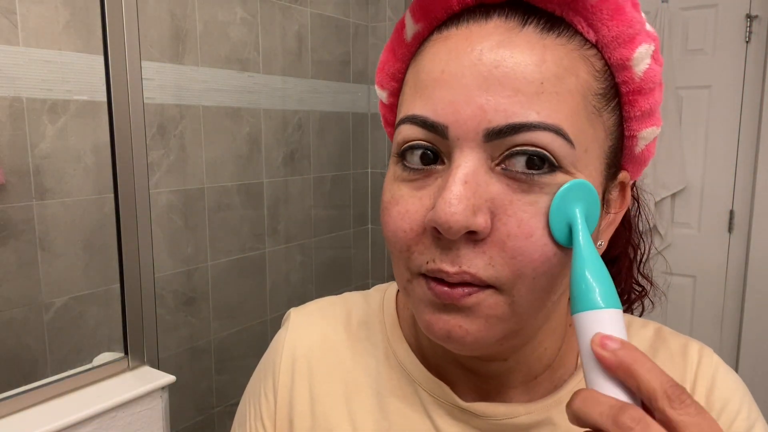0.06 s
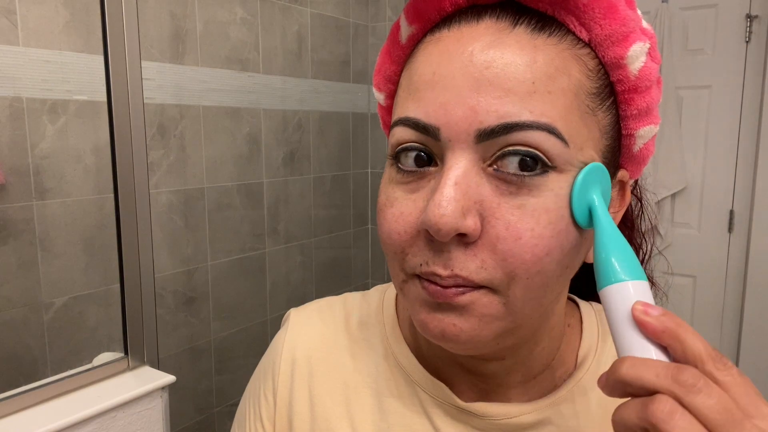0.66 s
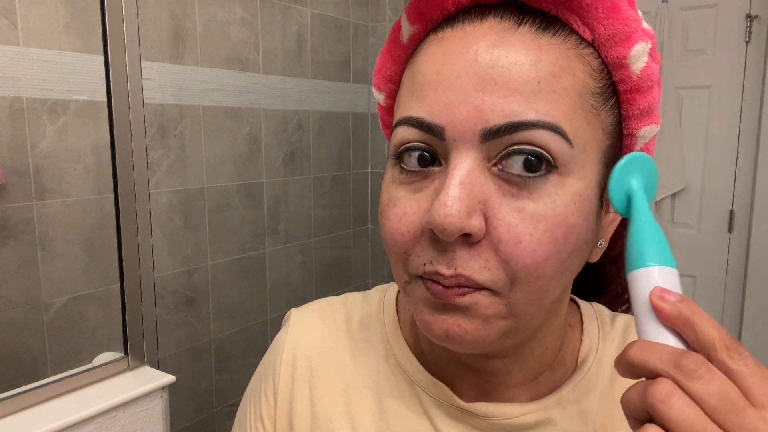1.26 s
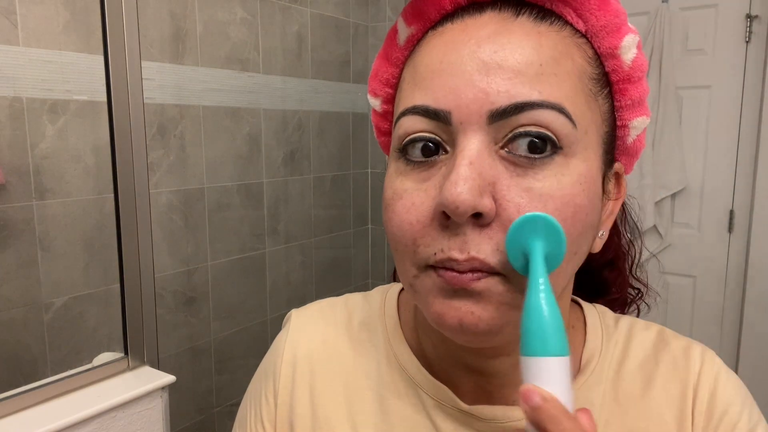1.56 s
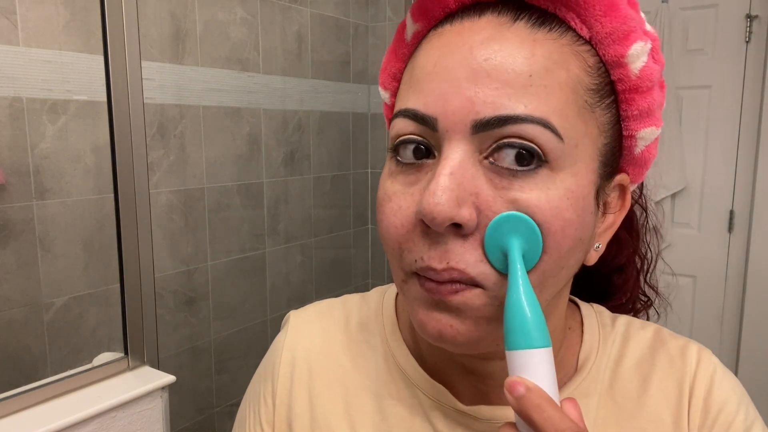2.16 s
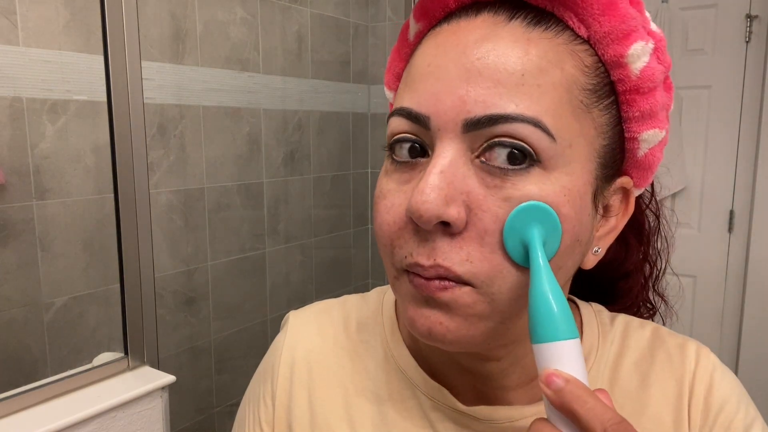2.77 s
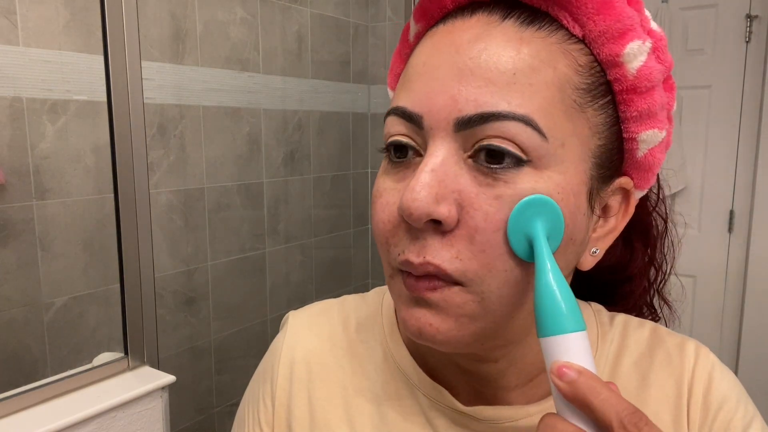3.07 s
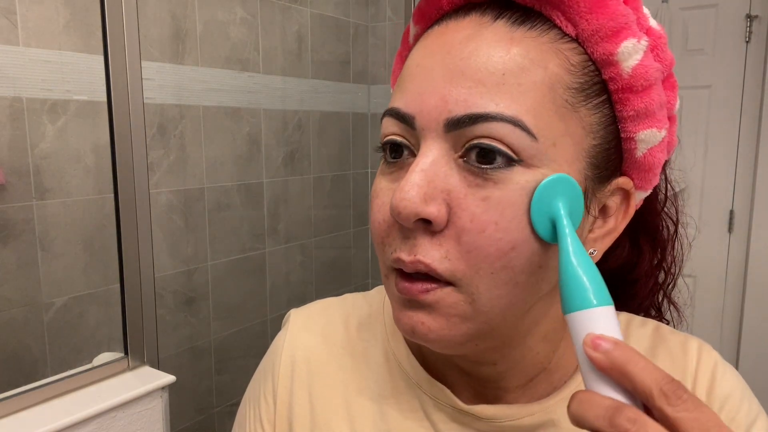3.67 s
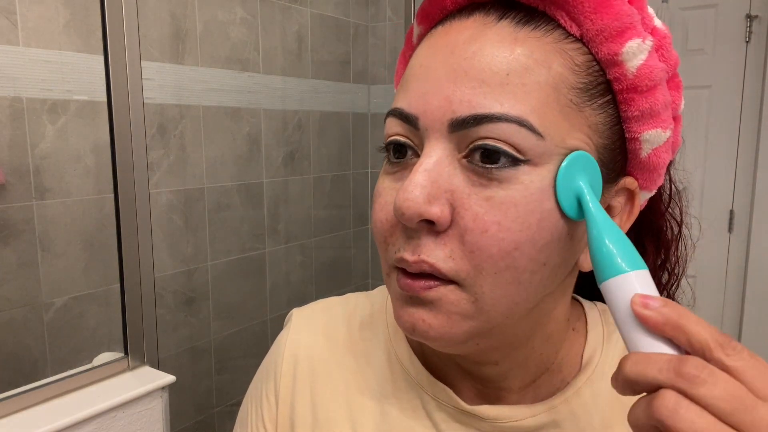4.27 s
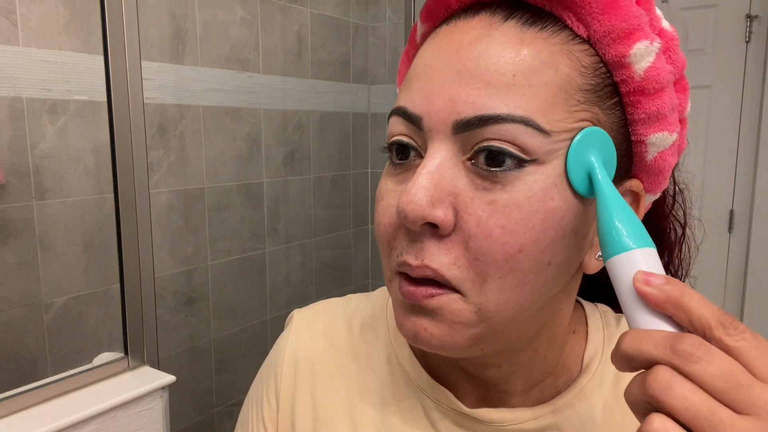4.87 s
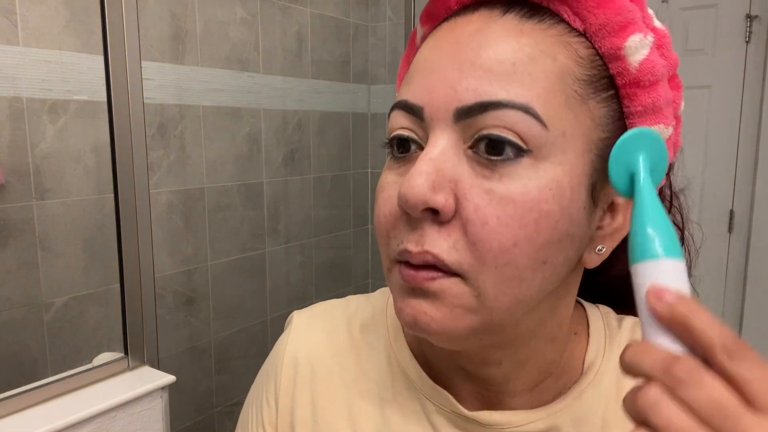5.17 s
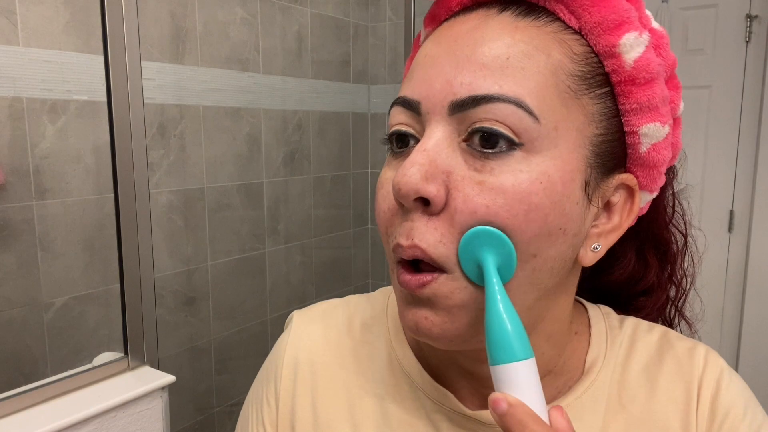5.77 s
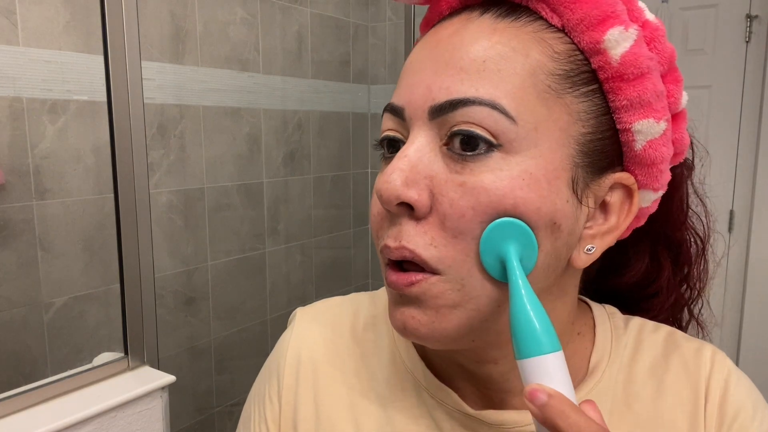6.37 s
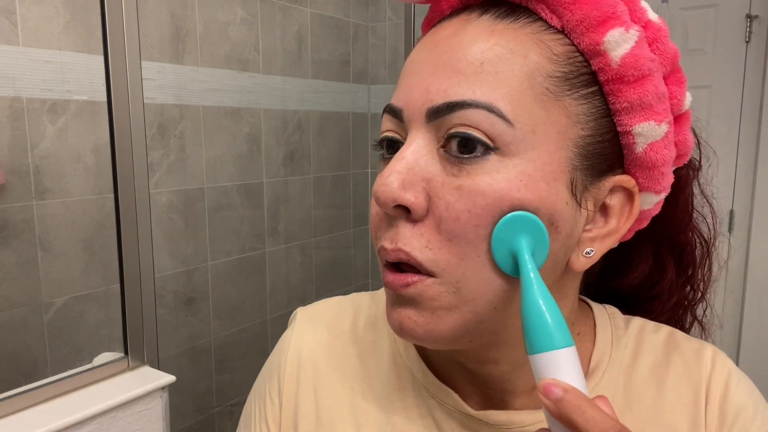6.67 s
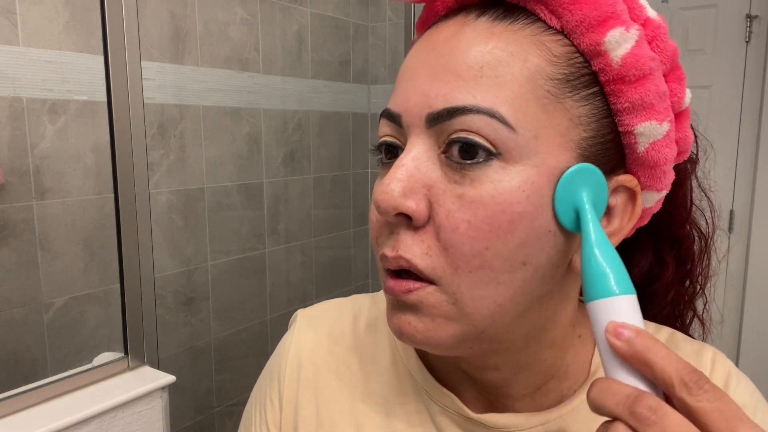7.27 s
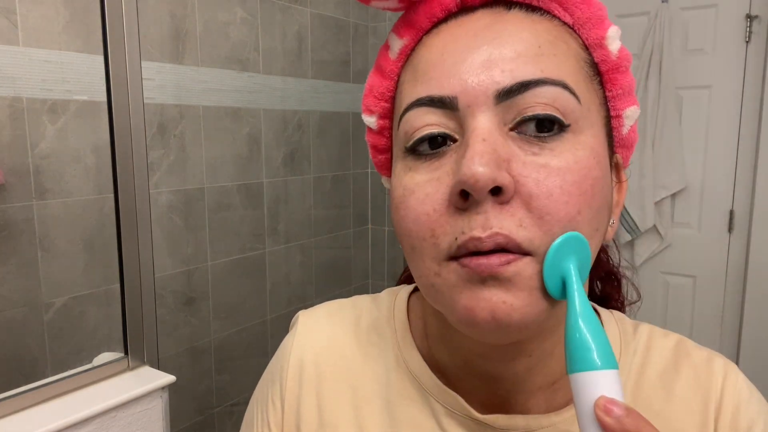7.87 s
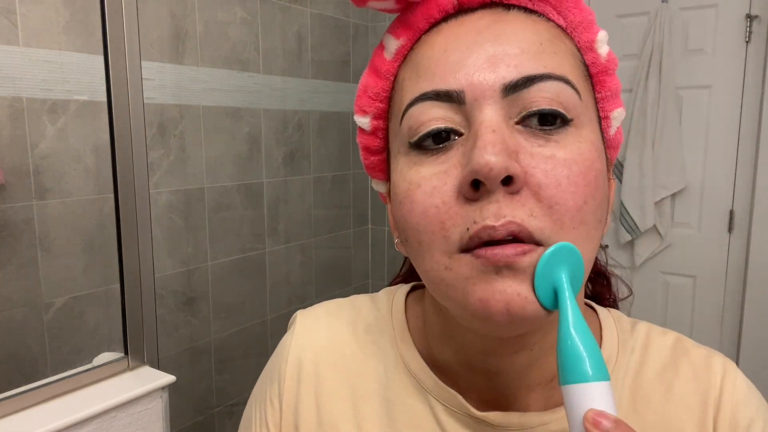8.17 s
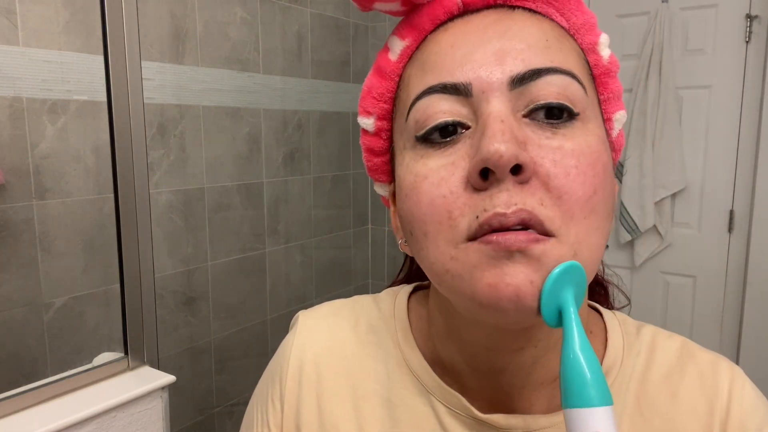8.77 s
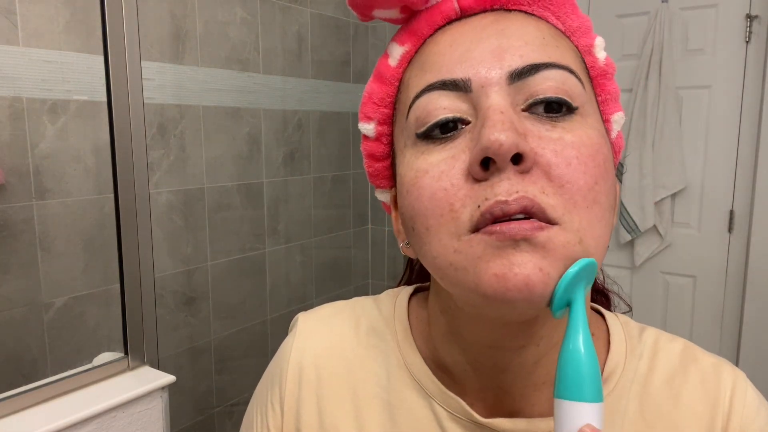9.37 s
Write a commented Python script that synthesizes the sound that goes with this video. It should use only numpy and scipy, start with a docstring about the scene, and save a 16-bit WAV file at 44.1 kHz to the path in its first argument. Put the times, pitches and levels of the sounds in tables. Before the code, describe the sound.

The thin, rattly plastic buzz of a handheld facial massager, dipping slightly in pitch when pressed on skin and rising between strokes.

```python
"""A battery face massager buzzes in a small tiled bathroom. Its off-centre weight hums and knocks twice
a turn, ringing the plastic parts; the motor brushes chatter. Pressed on skin, the motor slows; lifted
for a new stroke, it speeds up, rattles more loosely and the head rings. The pad rubs and chafes on the
skin. Soft bumps, a low room rumble and mains hum lie below."""
import sys
import numpy as np
from scipy import signal
from scipy.fft import rfft, irfft
from scipy.io import wavfile
from scipy.ndimage import uniform_filter1d

SR = 44100
rng = np.random.default_rng(int(sys.argv[2]) if len(sys.argv) > 2 else 0)


def output_pcm(signal):
    """Save a mono or channel-first signal as 16-bit PCM at the path in sys.argv[1].

    Samples are clipped to [-1, 1] before scaling.
    """
    pcm = np.clip(np.atleast_2d(signal).T, -1, 1) * 32767
    wavfile.write(sys.argv[1], SR, np.round(pcm).astype(np.int16))


N = 424683
TIME_S, FREQ_HZ = np.arange(N) / SR, np.maximum(np.arange(N // 2 + 1) * SR / N, 1)
TOP_HZ, ROOM_WET_DB = 14000, -7
GRIP_DB, GRIP_RATE_HZ = 1.53, 8  # shifting grip: each part wavers on its own

# Noise spectra, room and skin: f/Hz, relative level/dB
RUMBLE_SPECTRUM = [(15, -44), (28, -19), (40, 1), (60, -6), (80, 3), (120, 1.5), (160, -12), (240, -29),
                   (4000, -17), (14000, -30)]
RUB_SPECTRUM = [(80, -18), (170, 2), (700, 4), (1100, -6), (3000, -5), (14000, -24)]
# Stick-slip patches: t/s, length/s, level/dB, f/Hz
CHAFE_EVENTS = [(3.303, 0.37, -60.5, 610), (5.691, .52, -61, 616), (6.833, 0.31, -59.5, 610),
                (7.978, 0.328, -59, 560.5)]
# Bumps of hand and head: t/s, level/dB, f/Hz, T60/s
BUMP_EVENTS = [(0.33, -53.5, 230, 0.36), (1.285, -45.5, 620, 0.085), (2.619, -46, 482.6, 0.14),
               (3.327, -34.5, 1557, 0.055), (3.328, -52, 400.8, 0.16), (5.304, -48, 338.6, 0.12),
               (7.473, -50, 369.9, .22), (7.569, -45.5, 382, 0.22)]
# Shaft rate under changing load: t/s, f/Hz
SHAFT_HZ = [(0.0, 102.2), (0.21, 104.8), (0.59, 105.5), (1.07, 103.8), (1.18, 105), (1.31, 110.1),
            (1.39, 111.1), (1.55, 109.2), (1.82, 110.3), (1.98, 108.2), (2.79, 104.4), (3.0, 105.6),
            (3.99, 106.1), (4.4, 107.7), (4.91, 106.1), (5.02, 106.6), (5.18, 112.5), (5.25, 113.3),
            (5.34, 112), (5.52, 112.5), (5.66, 110.9), (6.49, 107.4), (6.68, 108.1), (6.97, 107.5),
            (7.3, 108.4), (7.45, 112.9), (7.51, 114), (7.64, 112.3), (7.89, 111.2), (8.1, 112.1),
            (8.39, 108.4), (8.72, 108.1), (8.96, 107), (9.63, 108.9)]
# Pad lift-offs: t/s
LIFTS_S = [1.16, 5.02, 6.8]
# Contacts in one turn: phase/turns, then relative level/dB into handle, head, neck, tick
CONTACTS = [(.29, 16.5, 14.5, 0.5, 0), (.575, 10, 25, 6.5, 2.5)]
# Resonances of the parts: f/Hz, width/Hz, relative level/dB
BARREL_MODES = [(635, 36, 7.5), (754, 41, 5.5), (875, 39, 9), (973, 11.6, 15.5), (1024, 110, 4)]
CAP_MODES = [(1176, 200, -12), (1300, 24, 8.5)]
HANDLE_MODES = [(1462, 82, 0.09), (1749, 166, -1.1)]
SOCKET_MODES = [(2387, 72, -1.2), (2564, 94, -0.79)]
COLLAR_MODES = [(2870, 290, 0)]
NECK_MODES = [(3177, 80, -0.97), (3504, 120, -0.5)]
STEM_MODES = [(3740, 220, -1.5), (4050, 240, -1.5), (4380, 260, -1)]
RIM_MODES = [(4726, 100, -0.56), (4814, 190, -1), (5040, 86, -2)]
CASING_MODES = [(5320, 260, -1.5), (5943, 100, 0.53)]
TICK_MODES = [(6646, 96, 3), (7190, 690, -2), (7604, 580, -4.5)]
BRUSH_MODES = [(8240, 860, 1.5), (9620, 880, 2), (10900, 520, 2), (12500, 680, -14)]
# Moving resonances: t/s, f/Hz
HEAD_HZ = [(0, 2060), (.6, 2050), (1.2, 2060), (1.7, 2140), (2.2, 2047), (5.0, 2020), (5.25, 2150),
           (6.2, 2015), (6.8, 2160), (7.2, 2080), (7.5, 2147), (8.2, 2108), (8.5, 2138), (9.63, 2138)]  # sinks under skin load
WHISTLE_HZ = [(3.0, 4800), (4.5, 4955), (4.9, 4780), (9.63, 4900)]  # rim, with the pad on bone
WHINE_HZ = [(0, 6000), (1.1, 6130), (1.45, 6200), (1.9, 6140), (2.25, 6200), (3.3, 6360), (4.1, 6000),
            (5.0, 5997), (5.3, 6265), (6.5, 6160), (7.6, 6208), (9.63, 6180)]
# Envelopes of hum and parts, before grip waver: t/s, level/dB
HUM_DB = [(0, -57), (.35, -47.5), (1.4, -51), (2.2, -43), (2.8, -52), (4.0, -51), (4.55, -46), (5.6, -49.5),
          (6.35, -44), (7.4, -48.5), (8.15, -55.5), (8.45, -43), (9.63, -44)]
BARREL_DB = [(0.0, -60.5), (0.4, -53.5), (0.88, -54.5), (1.04, -64), (1.42, -55), (1.63, -58.5), (2.5, -57),
             (3.15, -55.5), (4.85, -57), (5.5, -56.5), (6.45, -60), (6.81, -56), (8.26, -56.5),
             (8.53, -63.5), (8.9, -51.5), (9.63, -56.5)]
CAP_DB = [(0.0, -56), (0.94, -54.5), (2.3, -50), (2.38, -54.5), (3.2, -57.5), (5.12, -55), (5.35, -62),
          (5.44, -56.5), (7.13, -50.5), (7.67, -59), (7.86, -48.5), (8.45, -53), (9.63, -45.5)]
HANDLE_DB = [(0, -48.5), (1.1, -49.5), (1.5, -49), (2.3, -46), (2.65, -51), (2.85, -48.5), (3.1, -51.5),
             (3.35, -48.5), (4.9, -46.5), (5.3, -47.5), (5.65, -44), (6.4, -46), (8.0, -45.5),
             (9.63, -43.5)]
HEAD_DB = [(0, -46.5), (.6, -45), (1.08, -52), (1.42, -34), (1.62, -35.5), (2.0, -47), (2.41, -42.5),
           (3.97, -40.5), (4.43, -45.5), (4.99, -42.5), (5.28, -34.5), (5.6, -45), (5.92, -51),
           (6.14, -44.5), (6.5, -44), (6.88, -38.5), (7.2, -43), (7.53, -36), (7.8, -42.5), (8.3, -41),
           (8.7, -38.5), (9.18, -38.5), (9.28, -41), (9.63, -41.5)]
SOCKET_DB = [(0.0, -49.5), (1.15, -53), (1.34, -44), (1.9, -51), (2.01, -42), (2.06, -51), (2.36, -46),
             (2.41, -53.5), (4.13, -49.5), (4.5, -54), (5.34, -47), (5.98, -48.5), (6.33, -42), (6.54, -48),
             (6.68, -43.5), (6.81, -46.5), (9.63, -49.5)]
COLLAR_DB = [(0.0, -50.5), (1.29, -52), (1.34, -46), (2.79, -47), (3.32, -47), (3.86, -49.5), (4.8, -42),
             (5.42, -54), (5.85, -42.5), (7.32, -52.5), (8.13, -48), (8.23, -40.5), (8.6, -56),
             (9.63, -53.5)]
NECK_DB = [(0.0, -39.5), (0.45, -40.5), (0.67, -45), (0.72, -40), (1.37, -42), (1.71, -48.5), (1.9, -41.5),
           (2.25, -41.5), (2.57, -38.5), (2.63, -44), (2.76, -39.5), (3.3, -38), (5.3, -43.5), (5.39, -45),
           (5.85, -40.5), (6.25, -44), (8.5, -44.5), (9.63, -44)]
STEM_DB = [(0.0, -44), (0.24, -43.5), (1.2, -44.5), (1.66, -39), (2.33, -43.5), (4.93, -45), (5.15, -41),
           (5.85, -46), (6.84, -40.5), (7.03, -43), (7.9, -39.5), (9.63, -45.5)]
WHISTLE_DB = [(0, -49), (.4, -54), (2.7, -44), (3.2, -40), (3.4, -50), (4.1, -50), (4.42, -39), (4.95, -39),
              (5.2, -54), (5.39, -39), (5.55, -58), (8.6, -50), (9.0, -42), (9.3, -42), (9.55, -40)]
CASING_DB = [(0.0, -44), (0.13, -42), (0.72, -47.5), (1.53, -45), (2.22, -48), (4.24, -43), (6.81, -49),
             (7.03, -40.5), (7.53, -46.5), (7.67, -39), (8.56, -45), (9.63, -45)]
WHINE_DB = [(0.0, -43), (1.39, -50), (1.5, -37.5), (1.61, -44), (2.06, -39), (2.71, -52.5), (3.86, -43.5),
            (5.1, -44.5), (6.54, -42), (6.92, -51), (7.0, -45), (7.43, -45), (7.72, -45), (9.63, -42)]
TICK_DB = [(0.0, -47.5), (1.15, -52.5), (1.48, -46.5), (2.82, -50), (3.81, -44), (4.35, -50), (6.46, -48.5),
           (8.1, -43.5), (8.29, -47.5), (9.63, -51)]


def undb(db):
    """dB to gain."""
    return 10 ** (np.asarray(db) / 20)


def unit(x):
    """Scale the channel mean to rms 1."""
    return x / np.std(np.atleast_2d(x).mean(0))


def hold_rms(x, window_samples=6000):
    """Hold the channel mean at running rms 1."""
    return x / np.sqrt(uniform_filter1d(x.mean(0) ** 2, window_samples) + 1e-18)


def curve(table):
    """Timed table, interpolated per sample."""
    return np.interp(TIME_S, *np.transpose(table))


def ramp(start_s, rise_s):
    """Linear rise, 0 to 1."""
    return np.clip((TIME_S - start_s) / rise_s, 0, 1)


def wander(rate_hz):
    """Smooth random signal, spread 1."""
    size = int(SR / rate_hz)
    held = np.repeat(rng.standard_normal(N // size + 1), size)[:N]
    return unit(uniform_filter1d(uniform_filter1d(held, size), size))


def clicks(times_s, sizes, half_taps=8):
    """Band-limited clicks placed between samples."""
    at = times_s[:, None] * SR
    index = np.floor(at).astype(int) + np.arange(1 - half_taps, half_taps + 1)
    shape = np.sinc(index - at) * np.sinc((index - at) / half_taps)
    return np.bincount(np.clip(index, 0, N).ravel(), (sizes[:, None] * shape).ravel(), N + 1)[:N]


def colour(x, spectrum):
    """Filter by a spectrum table."""
    hz, db = np.transpose(spectrum)
    return irfft(rfft(x) * undb(np.interp(np.log(FREQ_HZ), np.log(hz), db)), N)


def band_sos(low_hz, high_hz):
    """Butterworth band-pass sections."""
    return signal.butter(2, [low_hz, high_hz], "band", fs=SR, output="sos")


def resonate(x, modes):
    """Ring static modes, signs alternating."""
    return sum((-1) ** k * undb(db) * signal.lfilter(*signal.iirpeak(hz, hz / width_hz, fs=SR), x)
               for k, (hz, width_hz, db) in enumerate(modes))


def glide(x, hz, width_hz):
    """Ring one mode, centre given per sample."""
    spin = np.exp(2j * np.pi * np.cumsum(hz) / SR)
    pole = np.exp(-np.pi * width_hz / SR)
    return (spin * signal.lfilter([1 - pole], [1, -pole], x / spin)).real


def pan(left_db):
    """Stereo gains, left relative to right."""
    return undb(np.array([[left_db], [0]]))


def bathroom(x, left_db, wet_db, t60_s=0.42, gap_s=0.003, sway_rad_per_s=0.74):
    """Panned direct sound plus tile reflections that shift as the hand moves."""
    t = TIME_S[:SR // 2]
    tails = rng.standard_normal((2, 2, len(t))) * np.exp(-np.log(1000) * t / t60_s) * (t > gap_s)
    tails /= np.sqrt(np.sum(tails ** 2, axis=2, keepdims=True))
    here, there = signal.fftconvolve(x[None, None], tails, axes=2)[:, :, :N]
    angle = sway_rad_per_s * (TIME_S + wander(1.478))
    return pan(left_db) * x + undb(wet_db) * (np.cos(angle) * here + np.sin(angle) * there)


def room_tone(rumble_db=-50, swell_db=1, mains_hz=60.7, mains_db=-56.5):
    """Swelling low rumble, faint hiss and wavering mains hum."""
    noise = rng.standard_normal(N) + 4.4 * rng.standard_normal((2, N))
    rumble = undb(rumble_db) * unit(pan(left_db=1.5) * colour(noise, RUMBLE_SPECTRUM))
    mains = unit(pan(left_db=-2) * np.sin(2 * np.pi * mains_hz * TIME_S + np.array([[0], [0.9]])))
    swell = undb(swell_db * wander(6))
    return swell * (rumble + undb(mains_db + 4.2 * wander(8.7)) * mains)


def bumps(rise_s=0.00078, thud_hz=130, thud_db=2):
    """Hand and head bump: a short scuff over a low thud; brighter ones thud less."""
    out = np.zeros((2, N))
    t = TIME_S[:SR // 2]
    for start_s, db, scuff_hz, t60_s in BUMP_EVENTS:
        noise = rng.standard_normal((2, len(t)))
        scuff, thud = (unit(signal.sosfilt(band_sos(0.71 * hz, 1.5 * hz), noise))
                       for hz in (scuff_hz, thud_hz))
        thud_gain = undb(thud_db) * min(1, 400 / scuff_hz)
        envelope = (1 - np.exp(-t / rise_s)) * np.exp(-np.log(1000) * t / t60_s)
        start = int(start_s * SR)
        out[:, start:start + len(t)] += undb(db) * (scuff + thud_gain * thud) * envelope
    return out


def rubbing(drag_db=-65.5, catch_db=2.2, press_db=9, press_s=2.967, rise_s=0.38, fall_s=0.61):
    """The pad drags on skin, catching and slipping; harder once, across the cheek."""
    press = ramp(press_s, rise_s) - ramp(press_s + rise_s, fall_s)
    level_db = drag_db + press_db * press + catch_db * wander(25)
    return undb(level_db) * unit(colour(rng.standard_normal((2, N)), RUB_SPECTRUM))


def chafes(slips_per_s=300, width_hz=110, edge_s=0.05):
    """Uneven slips ring the soft pad in short patches."""
    out = 0
    for start_s, length_s, db, hz in CHAFE_EVENTS:
        times_s = np.cumsum(rng.exponential(1 / slips_per_s, N // 100))
        times_s = times_s[times_s < TIME_S[-1]]
        slips = clicks(times_s, rng.standard_normal(len(times_s)))
        centre_hz = np.full(N, hz)
        ring = glide(glide(slips, centre_hz, width_hz), centre_hz, 2 * width_hz)
        gate = ramp(start_s, edge_s) - ramp(start_s + length_s - edge_s, 2 * edge_s)
        out = out + undb(db) * unit(ring) * gate
    return bathroom(out, left_db=-4, wet_db=ROOM_WET_DB)


def brush_chatter(turns, gaps=6, creep_s=1.6e-5, jitter_s=4e-6):
    """Brushes tick over the commutator gaps; timing creeps, so high overtones shimmer."""
    train = 0
    for phase in np.arange(gaps) / gaps:
        times_s = np.interp(np.arange(int(turns[-1])) + phase, turns, TIME_S)
        error_s = creep_s * wander(1.51) + jitter_s * rng.standard_normal(N)
        train = train + clicks(times_s + np.interp(times_s, TIME_S, error_s), np.ones(len(times_s)))
    return train


def head_slack(shaft_hz, free_hz=116, free_slack=0.2, lift_slack=1.8,
               rise_s=0.063, hold_s=0.28, fall_s=0.12):
    """Head play in its socket, 1 = tight: more at high speed (light load), most at lift-off."""
    unloaded = (1 + np.tanh((shaft_hz - free_hz) / 2)) / 2
    lifting = sum(ramp(s - rise_s / 2, rise_s) - ramp(s + hold_s, fall_s) for s in LIFTS_S)
    return 1 + free_slack * unloaded + lift_slack * lifting


def knocks(turns, slack, jitter_s=3e-6, creep_s=2e-5, scatter_db=0.73):
    """One click train per contact; a loose head strikes less evenly and the contact point creeps."""
    trains = []
    for phase, *_ in CONTACTS:
        times_s = np.interp(np.arange(int(turns[-1])) + phase, turns, TIME_S)
        play, creep = (np.interp(times_s, TIME_S, x) for x in (slack, wander(7)))
        late, size = rng.standard_normal((N // 100, 2))[:len(times_s)].T
        strikes_s = times_s + jitter_s * play * late + creep_s * creep
        trains.append(clicks(strikes_s, undb(scatter_db * size)))
    return np.array(trains)


def flex(x, modes, depth=0.022, rate_hz=2.2):
    """Modes drift together as the neck bends against the skin."""
    stretch = 1 + depth * wander(rate_hz)
    return sum((-1) ** k * undb(db) * glide(x, hz * stretch, width_hz)
               for k, (hz, width_hz, db) in enumerate(modes))


def radiate(ring, level_db, band_hz, left_db, wet_db=ROOM_WET_DB):
    """One part radiates its band into the room; its level wavers with the grip."""
    gain = undb(level_db + GRIP_DB * wander(GRIP_RATE_HZ))
    band = signal.sosfiltfilt(band_sos(*band_hz), ring)
    return gain * hold_rms(bathroom(band, left_db, wet_db))


def massager(wobble_hz=0.0721, rim_db=-46, clack_db=-8, chatter_db=-48, chin_db=-2.5):
    """The weight hums at shaft rate; knocks, scraping and brush chatter ring the plastic parts."""
    shaft_hz = curve(SHAFT_HZ) + wobble_hz * wander(14)
    hum_db = curve(HUM_DB) + GRIP_DB * wander(GRIP_RATE_HZ)
    turns = np.cumsum(shaft_hz) / SR
    slack = head_slack(shaft_hz)
    contact_gains = undb(np.array(CONTACTS)[:, 1:]).T
    handle, head, neck, tick = (unit(x) for x in contact_gains @ knocks(turns, slack))
    brushes = unit(brush_chatter(turns))
    scrape = unit(1 + np.cos(2 * np.pi * (turns - CONTACTS[1][0]))) / 2

    def scraped(drive, hiss_db, play=slack):
        """Clicks plus scraping hiss that swells around the main knock."""
        return unit(drive) + undb(hiss_db) * play * scrape * rng.standard_normal(N)

    buzz = radiate(resonate(scraped(handle, hiss_db=-17.5), BARREL_MODES),
                   curve(BARREL_DB), band_hz=(620, 1143), left_db=-26.5)
    buzz += radiate(resonate(scraped(handle, hiss_db=-19), CAP_MODES),
                    curve(CAP_DB), band_hz=(1070, 1530), left_db=-13.5)
    buzz += radiate(resonate(scraped(handle, hiss_db=-14), HANDLE_MODES),
                    curve(HANDLE_DB), band_hz=(1330, 1960), left_db=-43)
    buzz += radiate(glide(scraped(head, hiss_db=-21, play=1), curve(HEAD_HZ), width_hz=80),
                    curve(HEAD_DB), band_hz=(1720, 2390), left_db=-8, wet_db=-13)
    buzz += radiate(resonate(scraped(head, hiss_db=-19), SOCKET_MODES),
                    curve(SOCKET_DB), band_hz=(2020, 2900), left_db=-25)
    buzz += radiate(resonate(scraped(neck, hiss_db=-18), COLLAR_MODES),
                    curve(COLLAR_DB), band_hz=(2753, 3310), left_db=-23)
    buzz += radiate(flex(scraped(neck, hiss_db=-18), NECK_MODES),
                    curve(NECK_DB), band_hz=(3015, 3970), left_db=-10.5)
    buzz += radiate(flex(scraped(neck, hiss_db=-13), STEM_MODES),
                    curve(STEM_DB), band_hz=(3390, 4490), left_db=-16.5)
    buzz += radiate(resonate(scraped(neck, hiss_db=-16), RIM_MODES),
                    rim_db, band_hz=(4640, 5230), left_db=-14)
    buzz += radiate(glide(scraped(head, hiss_db=-16), curve(WHISTLE_HZ), width_hz=110),
                    curve(WHISTLE_DB), band_hz=(4600, 5350), left_db=-7)
    # dry clack of the bare knocks, tracking the neck's level
    buzz += radiate(head, curve(NECK_DB) + clack_db, band_hz=(2800, 6800), left_db=1, wet_db=-10)
    buzz += radiate(resonate(scraped(tick, hiss_db=-11), CASING_MODES),
                    curve(CASING_DB), band_hz=(5370, 6300), left_db=-9.5)
    buzz += radiate(glide(scraped(tick, hiss_db=-11), curve(WHINE_HZ), width_hz=340),
                    curve(WHINE_DB), band_hz=(5130, 7000), left_db=-3.5)
    buzz += radiate(resonate(scraped(tick + undb(-5) * brushes, hiss_db=-11), TICK_MODES),
                    curve(TICK_DB), band_hz=(6400, 8600), left_db=0.5, wet_db=-3)
    on_chin = ramp(start_s=8.15, rise_s=0.3)  # last stroke presses on the chin: less chatter
    buzz += radiate(resonate(scraped(brushes + undb(-3) * tick, hiss_db=-9), BRUSH_MODES),
                    chatter_db + chin_db * on_chin, band_hz=(7240, 13200), left_db=0, wet_db=-4.5)
    hum = unit(pan(left_db=-11) * np.sin(2 * np.pi * turns + np.array([[0], [1.1]])))
    return buzz + undb(hum_db) * hum


def scene():
    """Massager, skin and room, in stereo."""
    return massager() + rubbing() + chafes() + bumps() + room_tone()


def record(dry):
    """Steep low-pass at TOP_HZ."""
    return signal.sosfilt(signal.ellip(8, 0.2, 70, TOP_HZ, fs=SR, output="sos"), dry)


dry = scene()
out = record(dry)
output_pcm(out)
```